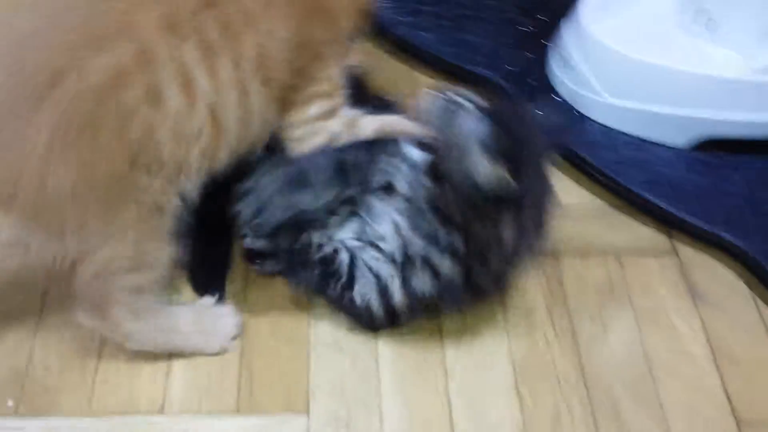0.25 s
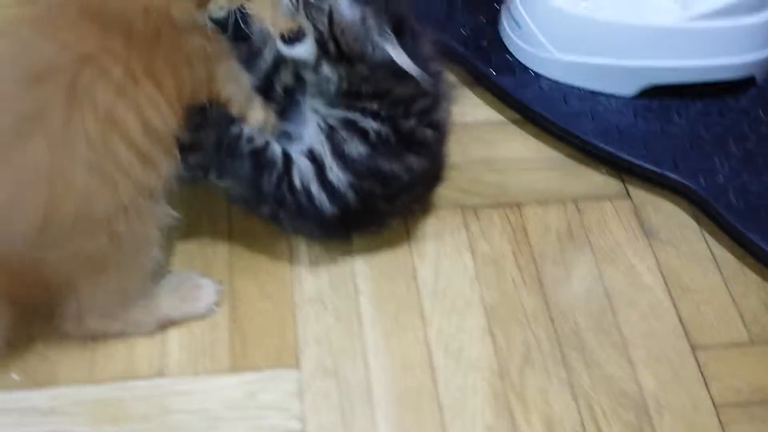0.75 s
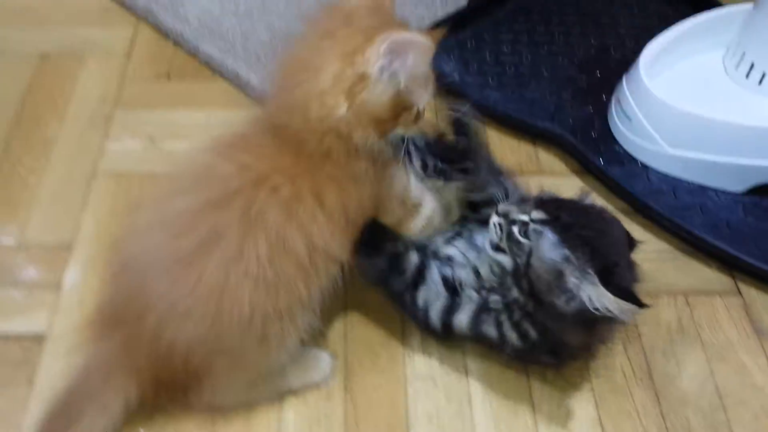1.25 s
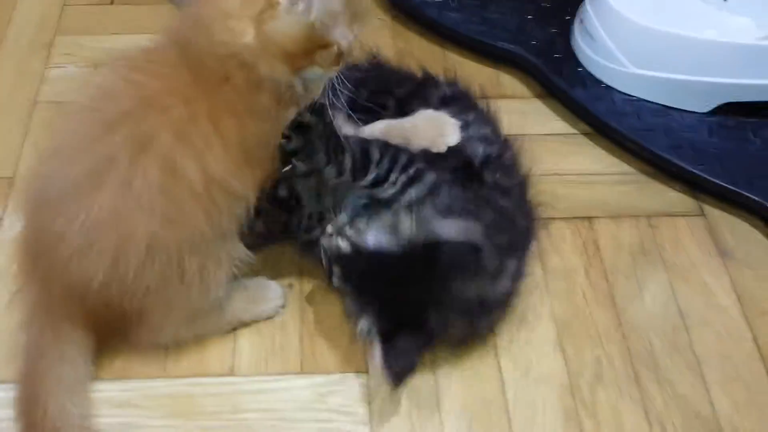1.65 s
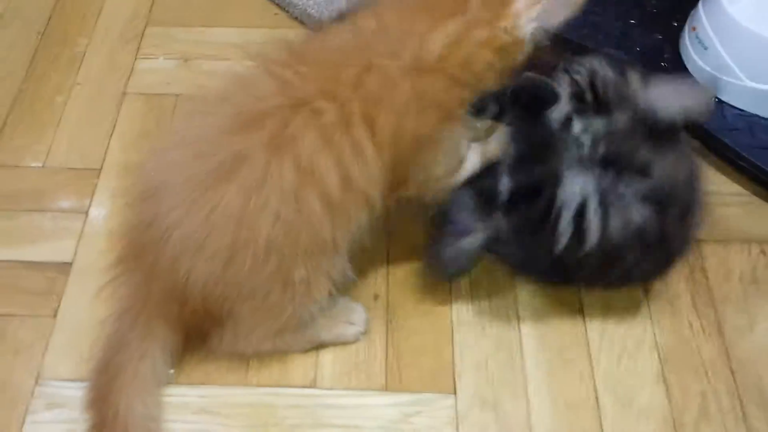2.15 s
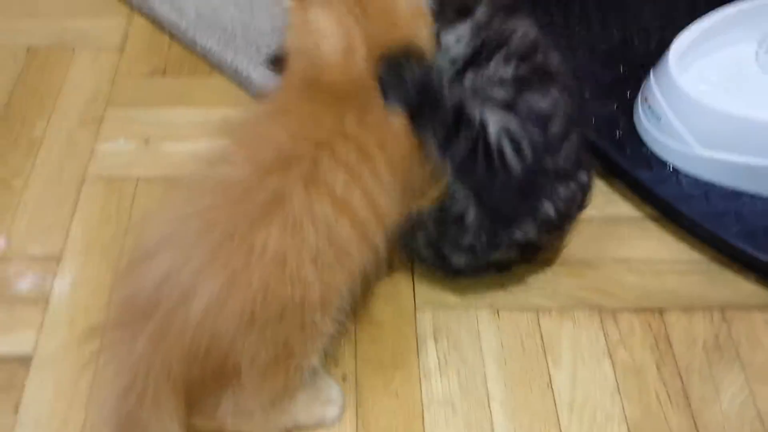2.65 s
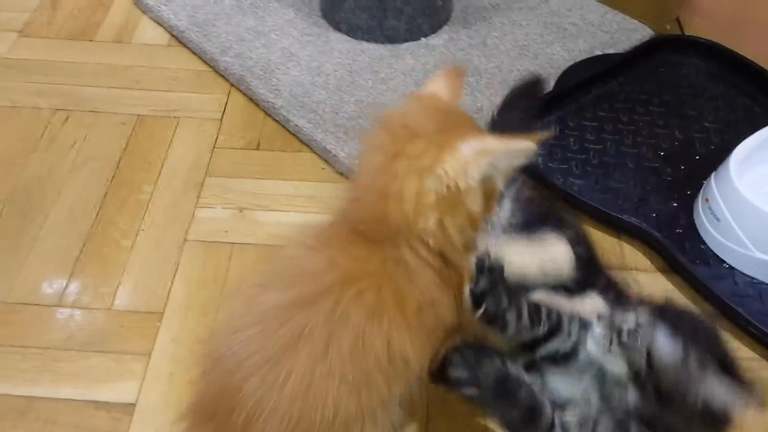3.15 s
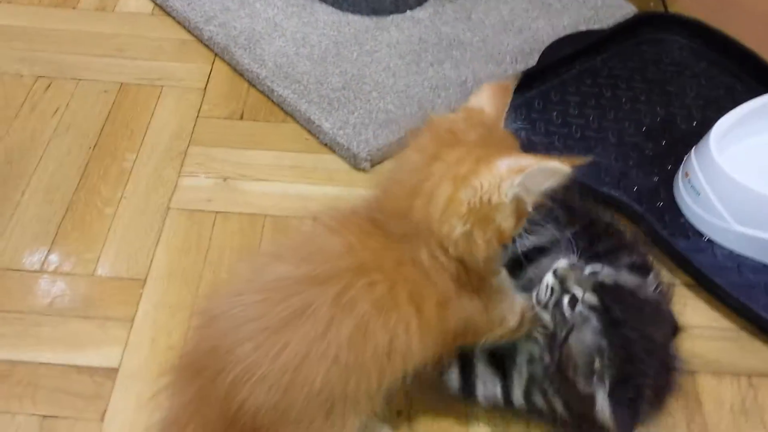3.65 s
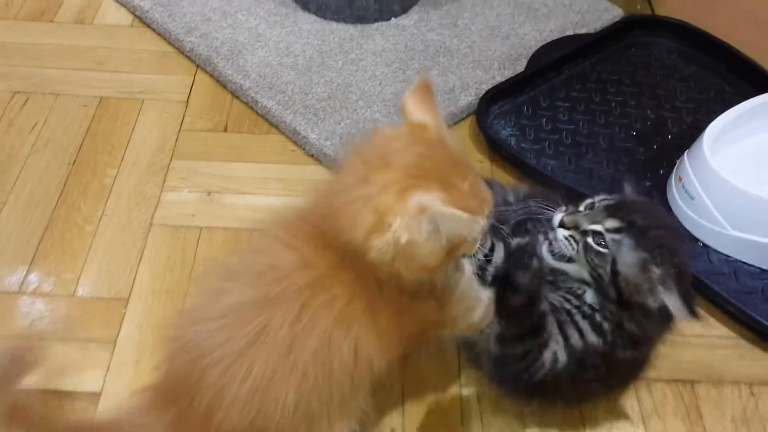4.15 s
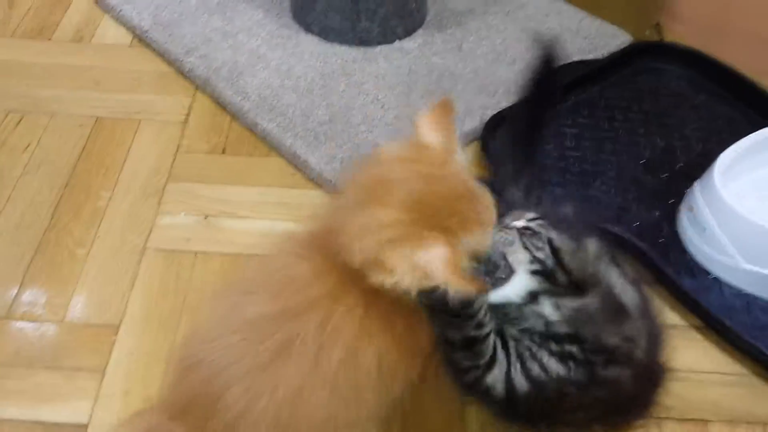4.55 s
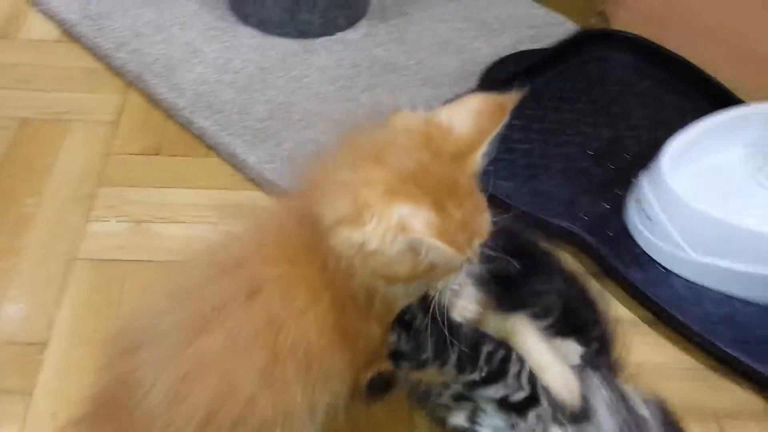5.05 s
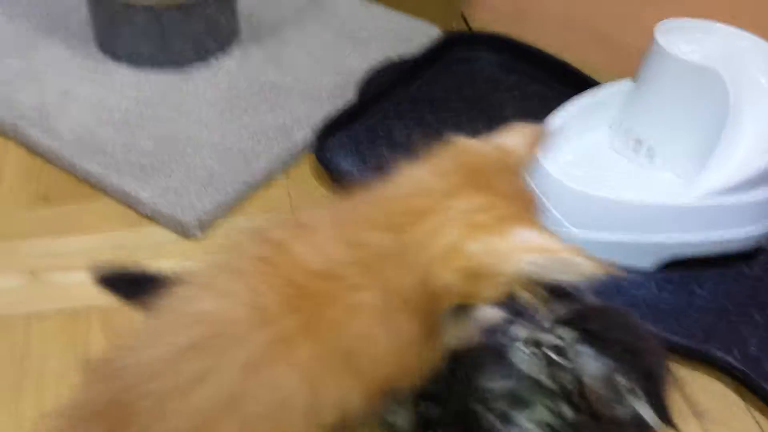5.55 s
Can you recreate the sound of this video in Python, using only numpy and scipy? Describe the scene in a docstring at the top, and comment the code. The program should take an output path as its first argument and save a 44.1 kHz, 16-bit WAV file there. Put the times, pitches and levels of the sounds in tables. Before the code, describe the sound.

Two kittens tussle close by in a small room. Fur rustles and bodies thump as a short, cracking yowl opens, followed at once by a spitting growl. Small knocks and ticks follow, then a long hoarse wail rises, clears and sinks into a pulsing grumble. Afterwards there is quiet rubbing and a brief rough scrape on the left microphone, over mains hum and hiss.

```python
"""Two kittens wrestling indoors

A sharp yowl, a spitting growl and a long wail sinking into a grumble: rough larynx pulses through resonances.
Thumps are decaying sines; ticks, a spit at the bark and a last soft squeak are short ringing noise bursts.
Fur rustles as swelling coloured noise; near the end pulses, grains and friction scrape the left microphone port.
A small room adds a diffuse tail, over mains hum, room air and microphone hiss."""
import sys
import numpy as np
from scipy import signal
from scipy.fft import rfft, irfft
from scipy.io import wavfile
from scipy.ndimage import uniform_filter1d

SR = 44100
rng = np.random.default_rng(int(sys.argv[2]) if len(sys.argv) > 2 else 0)


def store_wav(level_fs):
    """Save 16-bit WAV to argv[1]."""
    pcm = np.round(np.clip(np.atleast_2d(level_fs), -1, 1) * 32767)
    wavfile.write(sys.argv[1], SR, pcm.T.astype(np.int16))


N = 256220
TIME = np.arange(N) / SR  # s
FREQS = np.maximum(np.fft.rfftfreq(2 ** 18, 1 / SR), 1)  # Hz, kept above zero for the logarithm

# upper overtones of the wail and grumble, relative spectrum density: f/Hz, level/dB per Hz
WAIL_OVERTONES = [(2500, -50), (3500, -4), (4400, 5), (5300, -6), (6300, 2), (7300, 4), (8500, -6.5),
                  (11000, -23), (15000, -24)]


def from_db(db):
    """Amplitude ratio of a level: 20 dB is a factor of ten."""
    return 10 ** (np.asarray(db) / 20)


def rms_one(x):
    """Normalisation to unit mean power."""
    return x / np.sqrt(np.mean(x ** 2) + 1e-20)


def in_time(rows):
    """Linear interpolation of a curve's columns at every sample."""
    times, *columns = np.transpose(rows)
    return [np.interp(TIME, times, column) for column in columns]


def during(rows):
    """Gating: one while a curve lasts, with short linear fades just outside it."""
    start, end = rows[0][0], rows[-1][0]
    return np.interp(TIME, [start - .01, start, end, end + .015], [0, 1, 1, 0])


def over_hz(points):
    """Interpolation of a spectrum table along logarithmic frequency."""
    hz, value = np.transpose(points)
    return np.interp(np.log(FREQS), np.log(hz), value)


def filtered(x, gain):
    """Linear filtering: multiplication by a gain at each frequency."""
    spectrum = rfft(x, 2 * len(FREQS) - 2)
    return irfft(spectrum * gain)[..., :N]


def noise(spectrum):
    """Spectral shaping of white noise, scaled to unit power."""
    return rms_one(filtered(rng.standard_normal(N), from_db(over_hz(spectrum))))


def drift(rate_hz):
    """Random modulation: low-passed noise with a spread of one."""
    return rms_one(filtered(rng.standard_normal(N), 1 / (1 + (FREQS / rate_hz) ** 2)))


def swell(s, hold_s, rise_s, fall_s):
    """Exponential envelope: attack, hold from s on, release; rise and fall are the times for 20 dB."""
    away = np.maximum(s - TIME, 0) / rise_s + np.maximum(TIME - s - hold_s, 0) / fall_s
    return from_db(-20 * np.minimum(away, 10))


def resonance(x, hz, width_hz):
    """Damped oscillator: a two-pole resonance with gain one on top."""
    radius = np.exp(-np.pi * width_hz / SR)
    zeros = np.array([1, 0, -1]) * (1 - radius ** 2) / 2
    poles = [1, -2 * radius * np.cos(2 * np.pi * hz / SR), radius ** 2]
    return signal.lfilter(zeros, poles, x + 1e-18)


def moving_resonance(x, hz, width_hz):
    """Heterodyne filtering: shift a moving centre to zero, low-pass, and shift it back."""
    turn = np.exp(2j * np.pi * np.cumsum(hz) / SR)
    low_pass = signal.butter(2, width_hz / 2, fs=SR, output="sos")
    return np.real(turn * signal.sosfilt(low_pass, x / turn))


def evened(x):
    """Automatic gain: the mean power over 30 ms is held at one."""
    power = np.abs(uniform_filter1d(x * x, int(.03 * SR)))
    return x / np.sqrt(power + 1e-12)


def hoarseness(pitch_hz, catch_s, settle_s, hoarse, clear, creak, creak_hz, creak_span_hz):
    """Vocal fold regimes: hoarse until the folds catch, then clear, creaking where the pitch is too low."""
    starting = np.clip((catch_s - TIME) / settle_s, 0, 1)
    sinking = np.clip((creak_hz - pitch_hz) / creak_span_hz, 0, 1)
    return clear + np.maximum(hoarse * starting, creak * sinking)


def larynx(pitch_hz, rough, jitter, rasp, subharmonic, slope_db):
    """Vocal fold pulses: roughness brings jitter, subharmonics and puffs of noise; slope is per octave."""
    rough = np.clip(rough, 0, 1)
    jittered_hz = pitch_hz * (1 + jitter * (rough + 0.0997) * drift(111.1))
    phase = 2 * np.pi * np.cumsum(jittered_hz) / SR
    turn = np.exp(1j * phase)
    tone, partial = np.zeros(N), np.ones(N, complex)
    shimmer = drift(16)
    for k in range(1, 17):
        partial = partial * turn
        # the folds never close twice alike, so the high overtones waver most
        waver_db = min(.6 * k, 4) * np.roll(shimmer, k * N // 17)
        tone += from_db(slope_db * np.log2(k) + waver_db) * partial.real
    # strained folds slip into cycles of two and of five pulses, which adds a rattle between the harmonics
    rattle = np.cos(phase / 2 + drift(38)) + np.cos(phase / 5 + 2 * drift(16.7))
    tone = rms_one(tone) * (1 + subharmonic * rough * rattle)
    puffs = rng.standard_normal(N) * (1 + 1.33 * np.cos(phase))
    flutter = from_db(2.5 * np.sqrt(rough) * drift(140))
    return flutter * ((1 - .75 * rough) * tone + rasp * (rough ** 2 + .15) * puffs)


def cry(source, pitch_hz, jaw, tract, overtone_spectrum, overtone_db):
    """Source and filter: the jaw tunes the tract resonances; overtones follow the mouth level and pitch."""
    jaw = np.clip(jaw, 0, 1)
    out, gains = 0, []
    for shut_hz, open_hz, width_hz, shut_db, open_db in tract:
        gain = from_db(shut_db + jaw * (open_db - shut_db))
        centre_hz = shut_hz + jaw * (open_hz - shut_hz)
        out = out + gain * evened(moving_resonance(source, centre_hz, width_hz))
        gains.append(gain)
    overtones = evened(filtered(source, from_db(over_hz(overtone_spectrum))))
    overtones = from_db(overtone_db) * (pitch_hz / pitch_hz.max()) ** 2 * overtones
    mouth_gain = gains[-1]
    return (out + mouth_gain * overtones) / np.linalg.norm(gains, axis=0)


def yowl(strain, strain_range_db):
    """Overdriven vocal folds: a short, piercing protest whose voice cracks where it is loudest."""
    # pitch that arches and sinks: t/s, f/Hz
    pitch_curve = [(0, 685.4), (.09, 736), (.13, 813.2), (.272, 886.6), (.29, 802), (.335, 729), (.4, 703),
                   (.5, 508.6), (.63, 419.4)]
    # vocal effort ahead of the common lift: t/s, level/dB
    effort_curve = [(0.0, -36.5), (0.032, -39.5), (0.066, -30), (0.092, -33), (0.19, -27.5), (0.22, -18.5),
                    (0.242, -25.5), (0.29, -23), (0.358, -33), (0.482, -46), (0.522, -37), (0.63, -71)]
    # jaw: t/s, opening/0-1
    jaw_curve = [(.05, 0.77), (.12, 0.95), (.225, 0.95), (.3, 0.7), (.345, 0.6), (.41, 0), (.63, 0)]
    # throat, middle, mouth: shut f/Hz, open f/Hz, width/Hz, shut level/dB, open level/dB (relative)
    tract = [(722, 760, 690, 0.5, -16.5), (1110, 1784, 450, -7, -11), (1480, 3330, 880, -12.5, 2)]
    # upper overtones, relative spectrum density: f/Hz, level/dB per Hz
    overtone_spectrum = [(2500, -68), (3600, 2), (4250, 3), (4800, -2), (5300, -8), (6000, -5.5),
                         (7100, -8), (8500, -20), (11000, -27), (15000, -40)]
    (pitch_hz,), (effort_db,), (jaw,) = in_time(pitch_curve), in_time(effort_curve), in_time(jaw_curve)
    rough = hoarseness(pitch_hz, catch_s=.16, settle_s=.08, hoarse=.55, clear=.15,
                       creak=.6, creak_hz=560, creak_span_hz=50)
    rough = rough + strain * np.clip(1 + (effort_db - effort_db.max()) / strain_range_db, 0, 1)
    folds = larynx(pitch_hz, rough, jitter=.075, rasp=.7, subharmonic=1.0, slope_db=-3.0)
    voice = cry(folds, pitch_hz, jaw, tract, overtone_spectrum, overtone_db=-4.0)
    return during(pitch_curve) * from_db(effort_db + 1.5) * voice


def growl(voice_db, hiss_db):
    """Rough phonation with turbulence: a growling throat under a spit of air between the teeth."""
    # throat resonances, each passed twice: f/Hz, width of one pass/Hz, relative level/dB
    throat = [(327, 60, 4.5), (628, 178, 2.5), (750, 130, -2), (1643, 220, -9.5)]
    # air between the teeth, relative spectrum density: f/Hz, level/dB per Hz
    spit_spectrum = [(1800, -33), (2700, -1), (3300, -5.5), (3900, 0), (4900, -18), (5800, 1), (6700, -1),
                     (7700, -14), (11000, -17), (15000, -25)]
    peak_s = 0.94  # full strength from here
    source = larynx(np.full(N, 335.), 0.65, jitter=0.0617, rasp=1.1, subharmonic=0.46, slope_db=8.0)
    voice = sum(from_db(db) * resonance(resonance(source, hz, width_hz), hz, width_hz)
                for hz, width_hz, db in throat)
    voice = evened(voice) * from_db(1.1 * drift(33))
    hiss = noise(spit_spectrum) * from_db(1.5 * drift(50))
    voice_envelope = swell(peak_s, hold_s=0.08, rise_s=0.03, fall_s=0.3)
    hiss_envelope = swell(peak_s, hold_s=0.066, rise_s=0.038, fall_s=0.19)
    return from_db(voice_db) * voice_envelope * voice + from_db(hiss_db) * hiss_envelope * hiss


def wail():
    """Changing vocal fold regimes: a long cry with a hoarse start, a clear middle and a creaking end."""
    # pitch that arches more slowly than the yowl: t/s, f/Hz
    pitch_curve = [(2.472, 468.1), (2.68, 665), (2.745, 733.6), (2.805, 868), (2.89, 902), (2.985, 865),
                   (3.05, 760), (3.18, 668), (3.25, 535), (3.35, 420), (3.435, 410)]
    # vocal effort ahead of the common lift: t/s, level/dB
    effort_curve = [(2.475, -46), (2.559, -48), (2.665, -41.5), (2.839, -45), (2.947, -36.5), (3.123, -43),
                    (3.141, -38.5), (3.223, -35.5), (3.245, -42.5), (3.359, -35), (3.367, -39.5),
                    (3.43, -40.5)]
    # jaw: t/s, opening/0-1
    jaw_curve = [(2.47, 0.8), (2.5, 1), (2.62, 0.83), (2.7, 0.87), (2.82, 0.85), (2.97, 0.73), (3.17, 0.33),
                 (3.4, 0.19)]
    # throat, middle, mouth: shut f/Hz, open f/Hz, width/Hz, shut level/dB, open level/dB (relative)
    tract = [(466, 1390, 365, 4.5, -1.5), (1160, 2000, 450, -7.5, 2.5), (2060, 3350, 1150, -28.5, 5.5)]
    (pitch_hz,), (effort_db,), (jaw,) = in_time(pitch_curve), in_time(effort_curve), in_time(jaw_curve)
    rough = hoarseness(pitch_hz, catch_s=2.84, settle_s=.12, hoarse=.6, clear=.07,
                       creak=.62, creak_hz=500, creak_span_hz=70)
    folds = larynx(pitch_hz, rough, jitter=.085, rasp=.85, subharmonic=.8, slope_db=-4.0)
    voice = cry(folds, pitch_hz, jaw, tract, WAIL_OVERTONES, overtone_db=-1.5)
    return during(pitch_curve) * from_db(effort_db + 0.8) * voice


def grumble(pitch_hz, sag_hz, bark_db, bark_s, throb_hz, throb_db):
    """Exponential relaxation: a rough bark settles, as the jaw closes, into a throbbing note."""
    # four resonances: shut f/Hz, open f/Hz, width/Hz, shut level/dB, open level/dB (relative)
    tract = [(330, 330, 87, -21, 1), (923, 960, 336, -1.5, 0.5), (1494, 1870, 620, -8, -5.5),
             (1830, 1750, 460, -17, -8.5)]
    start_s, hold_s, level_db = 3.45, 0.36, -40.5
    age = np.maximum(TIME - start_s, 0)
    bark = np.exp(-age / bark_s)
    pitch = pitch_hz - sag_hz * bark
    folds = larynx(pitch, .4 + .42 * bark, jitter=.085, rasp=.85, subharmonic=.9, slope_db=-1.5)
    effort_db = level_db + bark_db * bark + throb_db * np.cos(2 * np.pi * throb_hz * age)
    envelope = swell(start_s, hold_s, rise_s=0.013, fall_s=0.023)
    # the bark also serves as the jaw opening
    return envelope * from_db(effort_db) * cry(folds, pitch, bark, tract, WAIL_OVERTONES, overtone_db=-10)


def scuffle():
    """Impact, ringing and friction: damped sines thump, resonant noise bursts ring and decay, fur rubs."""
    # bodies and paws landing: t/s, level/dB (peak ahead of attack and decay), f/Hz, decay by 60 dB/s
    thumps = [(.015, -36, 139, 0.078), (0.086, -31, 346, 0.062), (0.124, -37, 112, 0.18),
              (0.233, -41.5, 107, 0.28), (.535, -38, 369, 0.092), (0.623, -29.5, 337, 0.016),
              (0.853, -31.5, 254, 0.039), (1.576, -30, 148, 0.028), (1.636, -43.5, 133, 0.13),
              (2.083, -48.5, 182, 0.17), (2.151, -47.5, 161, 0.22), (2.279, -50.5, 141, 0.15),
              (4.693, -41, 224, 0.045)]
    # short ringing noise bursts (ticks, the spit at the bark, a last soft squeak), two filter passes:
    # t/s, starting level/dB, f/Hz, width of one pass/Hz, decay by 60 dB/s
    ringing_bursts = [(.535, -42, 6000, 4500, .1), (.556, -38, 7000, 3500, .07),
                      (.732, -56, 1100, 1200, .06), (.853, -49, 6500, 3000, .04),
                      (.866, -40, 2900, 800, .03), (.925, -29, 2900, 1100, .035),
                      (.926, -41, 6900, 400, .25), (.927, -45, 750, 400, .06),
                      (1.024, -23, 6500, 1100, .025), (1.386, -45.5, 1300, 2000, .05),
                      (1.412, -52, 2700, 900, .06), (1.502, -42, 4700, 4000, .035),
                      (1.958, -32.5, 6000, 1600, .012), (1.978, -35, 6600, 1500, .01),
                      (3.444, -44, 6600, 900, .25), (3.446, -46, 4550, 600, .17),
                      (4.694, -44, 700, 1200, .04), (5.187, -55, 1500, 2000, .07),
                      (5.635, -59, 1230, 500, .45)]
    # fur rubs as the kittens shift their grip: t/s at full strength, level/dB, 20 dB rise/s, 20 dB fall/s
    rubs = [(0, -41.5, .1, 1.2), (.85, -53, 0.14, 0.67), (1.48, -56, 0.15, 0.43), (2.0, -54.5, 0.13, 0.74),
            (2.65, -59, 0.37, 4.5), (3.3, -53.5, 2.3, 1.7), (3.78, -50, 0.59, 0.23),
            (4.348, -51, 0.57, 0.53), (5.19, -56, 0.78, 0.11), (5.67, -52.5, 0.12, 0.24)]
    # fur, relative spectrum density: f/Hz, level/dB per Hz
    fur_spectrum = [(300, 1.5), (1500, -10), (3000, -4), (4700, -3.5), (5900, 1.5), (6900, 4), (8500, -6),
                    (11000, -15.5), (15000, -11.5)]
    rest_db = -73.5  # fur between the rubs
    rub_power = sum((from_db(db) * swell(s, 0, rise_s, fall_s)) ** 2 for s, db, rise_s, fall_s in rubs)
    rubbing = np.sqrt(from_db(rest_db) ** 2 + rub_power)
    out = rubbing * from_db(2.1 * drift(15.0)) * noise(fur_spectrum)
    age = np.arange(SR // 2) / SR
    for s, db, hz, t60 in thumps:
        attack = 1 - np.exp(-age / 0.0015)
        thud = np.sin(2 * np.pi * hz * age) * from_db(db - 60 * age / t60) * attack
        start = int(s * SR)
        out[start:][:len(age)] += thud[:N - start]
    for s, db, hz, width_hz, t60 in ringing_bursts:
        white = rng.standard_normal(len(age))
        burst = rms_one(resonance(resonance(white, hz, width_hz), hz, width_hz))
        burst = burst * from_db(db - 60 * age / t60)
        start = int(s * SR)
        out[start:][:len(age)] += burst[:N - start]
    return out


def port_scrape(low_cut_hz, grains_per_s, rebound_hz, rise_s, fall_s, touch_db):
    """Stick and slip: one-sided pressure pulses and friction, with a short, dull rebound of the casing."""
    # snags, ahead of rebound and low cut: t/s, peak level/dB, width at half height/ms
    snags = [(5.0243, -16, 0.3), (5.044, -27, 0.11), (5.0658, -13, 0.3), (5.067, -16, 0.08),
             (5.074, -25, 0.2), (5.0743, -0.5, 0.16), (5.0774, -9.5, 0.13), (5.0838, -18, 0.28),
             (5.089, -12, 0.057), (5.1235, -9.5, 0.05), (5.128, -11.5, 0.082), (5.13, -12, 0.43)]
    # short pushes across the port: t/s, hold/s, coarse grain level/dB, fine friction level/dB
    drags = [(5.025, 0.0023, -40, -61), (5.066, .003, -33, -37), (5.076, .014, -37, -57),
             (5.113, 0.0063, -33, -36), (5.123, .008, -29.5, -45)]
    # friction, relative spectrum density: f/Hz, level/dB per Hz
    friction_spectrum = [(500, 12), (3000, -8), (7000, -2), (10000, -5.5), (14500, 1), (16000, -14)]
    pulses = 0
    for s, db, width_ms in snags:
        half_widths = 2000 * (TIME - s) / width_ms
        pulses = pulses - from_db(db) * np.exp(-np.minimum(np.log(2) * half_widths ** 2, 50))
    grains = -rng.exponential(1, N) * (rng.random(N) < grains_per_s / SR)
    grains = rms_one(signal.sosfilt(signal.butter(2, 3500, fs=SR, output="sos"), grains + 1e-18))
    friction = noise(friction_spectrum)
    # a light touch lasts from the second push to the last
    touch_s = drags[1][0]
    touch = swell(touch_s, drags[-1][0] - touch_s, rise_s=0.1, fall_s=0.017)
    contact = pulses + from_db(touch_db) * touch * (grains + friction)
    for s, hold_s, coarse_db, fine_db in drags:
        rubbing = from_db(coarse_db) * grains + from_db(fine_db) * friction
        contact = contact + swell(s, hold_s, rise_s, fall_s) * rubbing
    rebound = resonance(resonance(contact, rebound_hz, 330), rebound_hz, 340)
    high_pass = signal.butter(2, low_cut_hz, "high", fs=SR, output="sos")
    return signal.sosfilt(high_pass, contact + 0.74 * rebound)


def room(x, wet_db, wall_hz):
    """Diffuse reverberation: a duller, exponentially decaying noise tail, different at each microphone."""
    t60_s = 0.47
    age = np.arange(int(.7 * SR)) / SR
    tail = rng.standard_normal((2, len(age))) * from_db(-60 * age / t60_s) * (age > .004)
    tail = signal.sosfilt(signal.butter(1, wall_hz, fs=SR, output="sos"), tail)
    tail /= np.sqrt(np.sum(tail ** 2) / 2 * SR / (np.pi * wall_hz))
    return from_db(wet_db) * signal.fftconvolve(x[None], tail, axes=1)[:, :N]


def background(air_db):
    """Interchannel coherence: mains hum over room air whose channels are alike mainly in the bass."""
    # mains hum ahead of the port balance: f/Hz, rms level/dB
    hum_lines = [(50, -82.5), (100, -59), (150, -67), (200, -68.5), (300, -65.5)]
    # room air, relative spectrum density: f/Hz, level/dB per Hz
    air_spectrum = [(20, -59), (45, -16), (80, 4.5), (140, -1.5), (250, -6), (400, -8.5), (700, -17),
                    (1500, -19), (3000, -19.5), (4700, -23.5), (6800, -11), (8500, -28), (15000, -37.5)]
    # left-right likeness of the room air: f/Hz, correlation/0-1
    likeness = [(60, 0.51), (290, 0.59), (640, 0.13), (1400, 0), (15000, 0)]
    hum = 0
    for hz, db in hum_lines:
        gain = np.sqrt(2) * from_db(db + 0.25 * drift(0.77))
        hum = hum + gain * np.sin(2 * np.pi * (hz * TIME + rng.random()))
    alike = np.clip(over_hz(likeness), -1, 1)
    mid = filtered(noise(air_spectrum), np.sqrt((1 + alike) / 2))
    side = filtered(noise(air_spectrum), np.sqrt((1 - alike) / 2))
    return hum + from_db(air_db) * (mid + side * [[1], [-1]])


def scene():
    """Superposition at two ports: kittens a little to the right, a scrape on the left with a faint right ring."""
    # the right port hears the kittens first: f/Hz, phase lead/rad
    port_phase = [(100, 0.037), (500, 0.6), (1000, 0.69), (1900, 1.47), (2500, 1.21), (2950, 3.16),
                  (3500, 4.7), (4500, 5.1), (6000, 8.8), (7500, 8), (15000, 17)]
    # the right port resonates, so it takes most of the treble: f/Hz, left minus right level/dB
    port_balance = [(100, -0.5), (1200, -2), (2200, 2), (2900, -5), (3500, -10.5), (4500, -15), (5800, -25),
                    (6800, -33), (8500, -17), (11000, -19), (15000, -4.5)]
    kittens = (yowl(strain=0.26, strain_range_db=3) + growl(voice_db=-40.5, hiss_db=-44.0) + wail()
               + grumble(pitch_hz=442, sag_hz=74.2, bark_db=4.5, bark_s=.05, throb_hz=6.62, throb_db=4.0)
               + scuffle())
    left = filtered(kittens, np.exp(-1j * over_hz(port_phase)))
    direct = np.array([left, kittens])
    sound = direct + room(kittens, wet_db=-7.5, wall_hz=7000) + background(air_db=-59.0)
    # the balance keeps the summed power gain of the two ports constant
    ratio = from_db(over_hz(port_balance))
    port_gains = np.array([ratio, np.ones_like(ratio)]) * np.sqrt(2 / (1 + ratio ** 2))
    sound = filtered(sound, port_gains)
    scrape = port_scrape(low_cut_hz=39, grains_per_s=1600, rebound_hz=146,
                         rise_s=0.011, fall_s=.006, touch_db=-47)
    return sound + np.array([scrape, from_db(-12.0) * resonance(scrape, 7600, 1500)])


def record(dry):
    """Self-noise and band limiting: microphone hiss is added and the top is cut."""
    cutoff_hz = 15600
    hiss = from_db(-64.0) * rng.standard_normal((2, N))
    low_pass = signal.ellip(10, .1, 80, cutoff_hz, fs=SR, output="sos")
    return signal.sosfilt(low_pass, dry + hiss)


dry = scene()
out = record(dry)
store_wav(out)
```